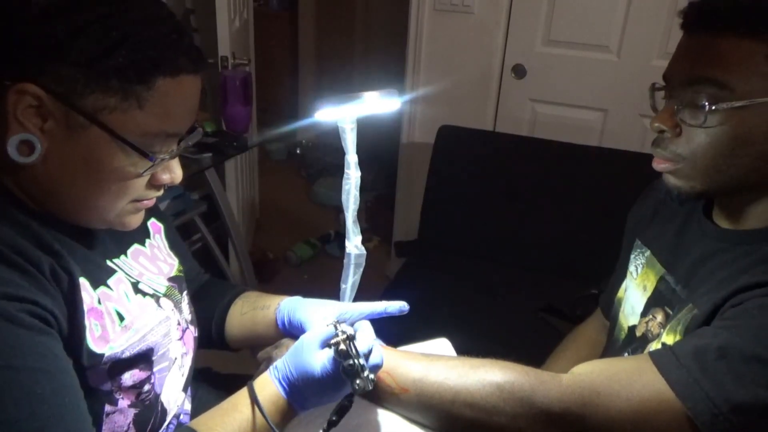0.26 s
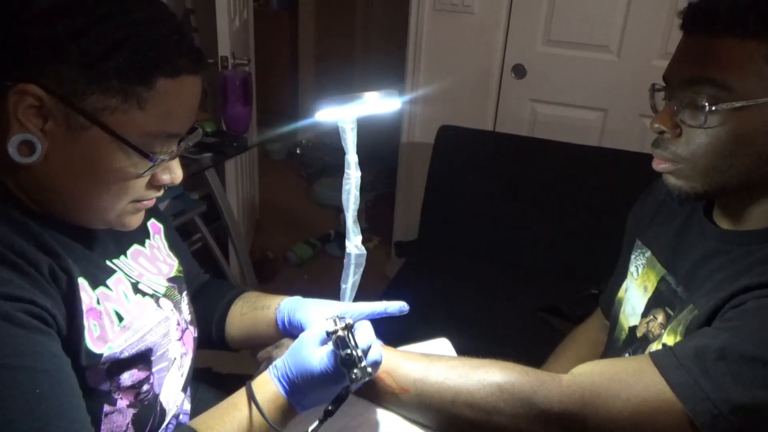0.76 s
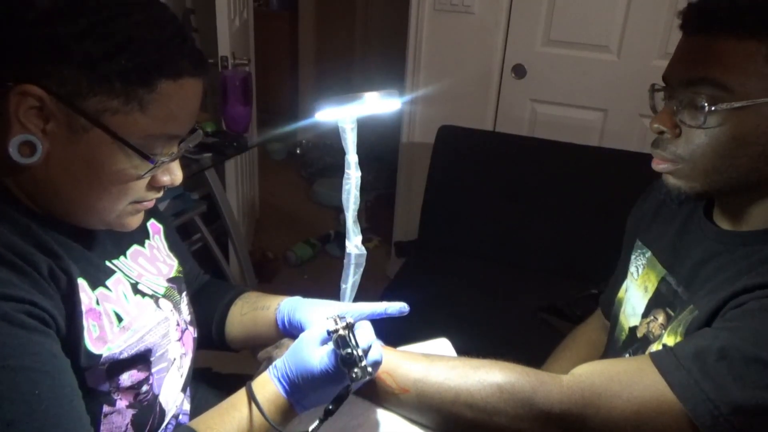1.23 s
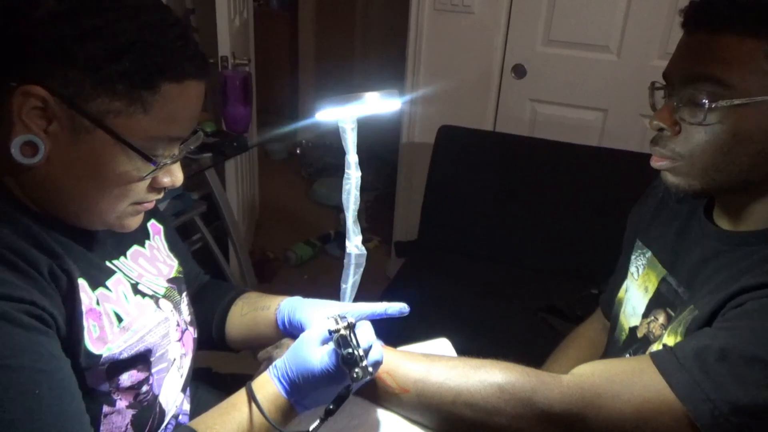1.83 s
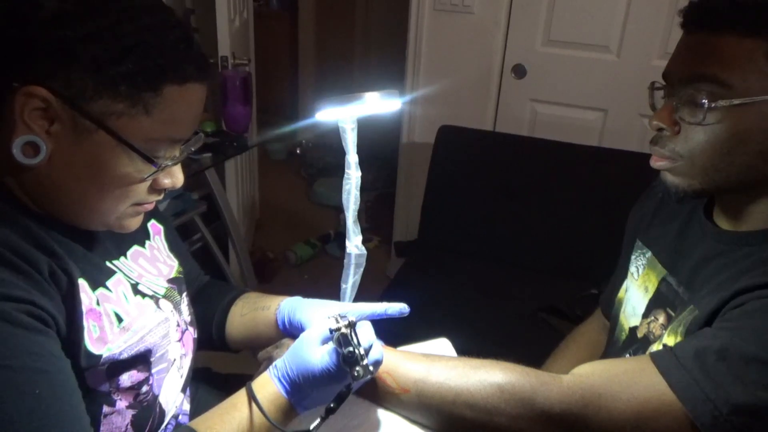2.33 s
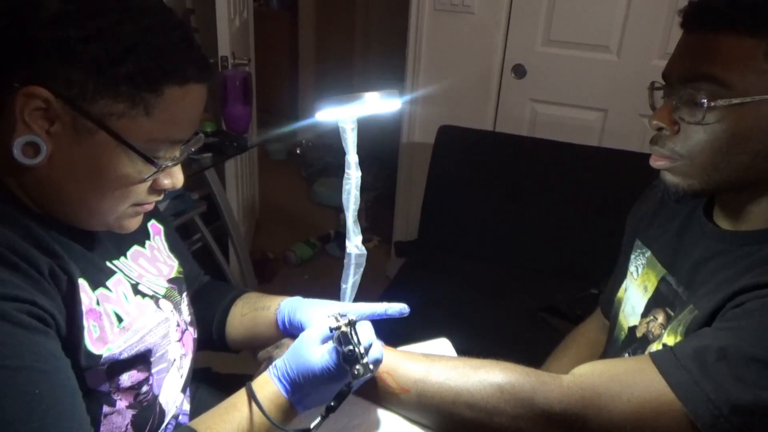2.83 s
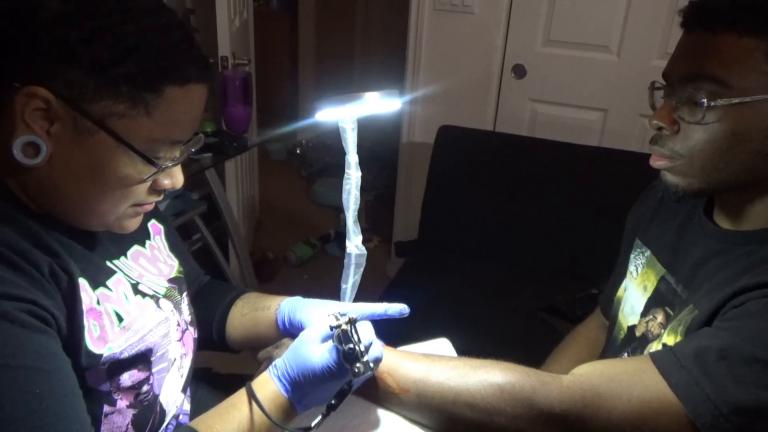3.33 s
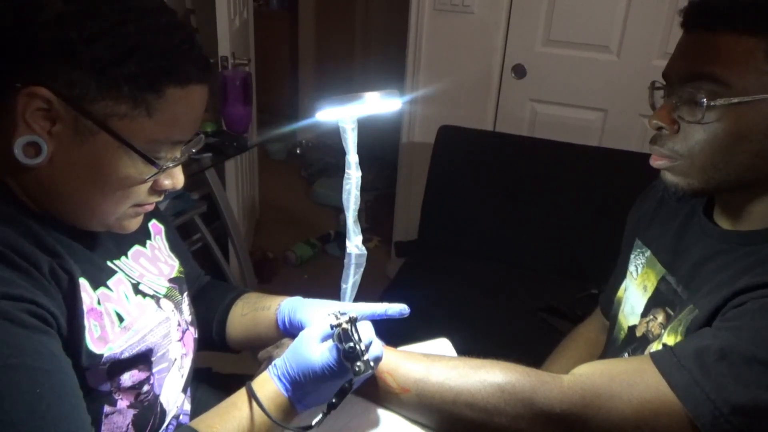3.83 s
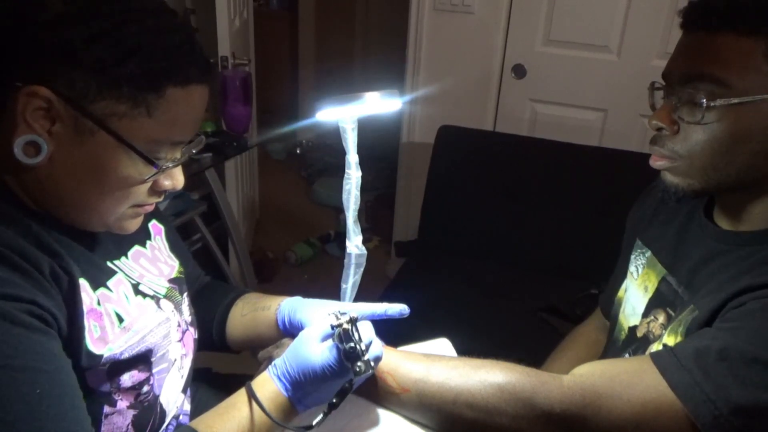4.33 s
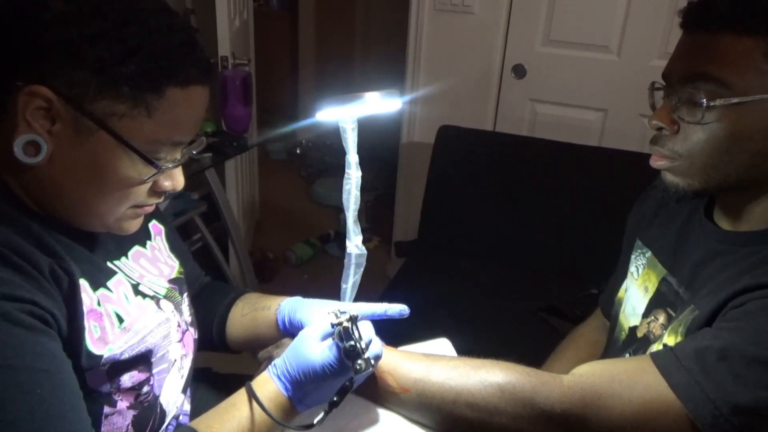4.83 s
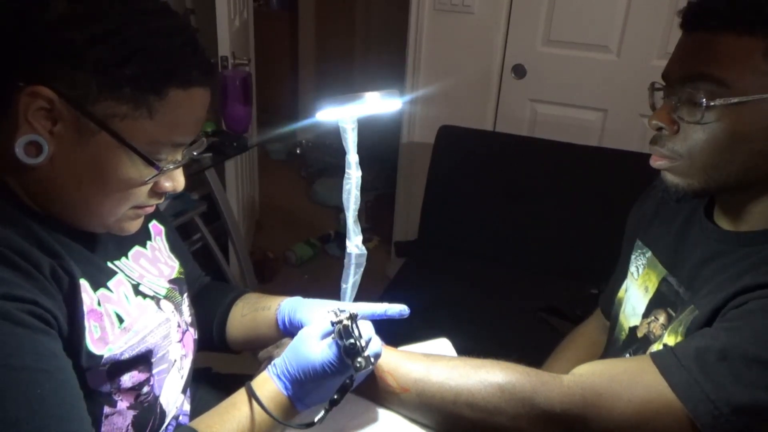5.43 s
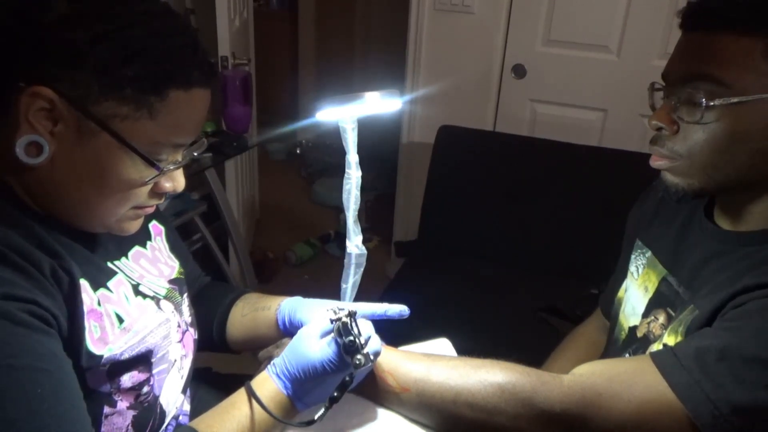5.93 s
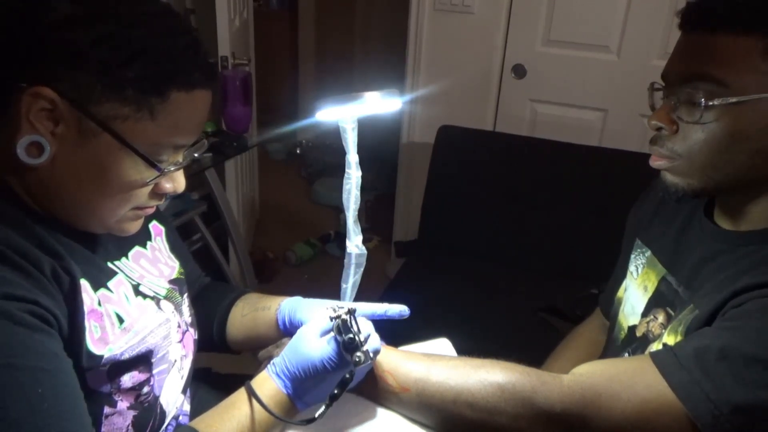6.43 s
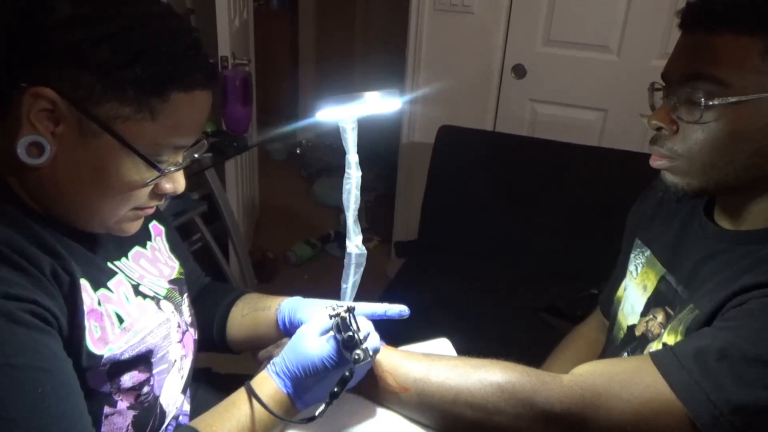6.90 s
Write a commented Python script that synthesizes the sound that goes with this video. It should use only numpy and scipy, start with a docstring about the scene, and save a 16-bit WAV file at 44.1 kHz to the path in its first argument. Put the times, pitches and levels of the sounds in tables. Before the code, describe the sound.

Steady harsh electric buzz of a tattoo machine in a small room, slightly uneven and drifting in colour, with a short woody creak near two seconds.

```python
"""A coil tattoo machine buzzes on a forearm in a small room: its armature snaps down 107 to 110 times a second.
Each snap rings the steel frame and rattles the needle; the beat jumps between two paces and turns ragged
as the needle drags. Arm, table and walls echo the snaps, and the colour drifts as the grip shifts.
Behind it is the soft rush of the room, made of filtered noise with a faint drone.
Something creaks briefly, like a seat: a row of small slips, each with a squeak and a hollow knock."""
import sys
import numpy as np
from scipy import signal
from scipy.fft import rfft, irfft, next_fast_len
from scipy.io import wavfile
from scipy.ndimage import uniform_filter1d

SR = 44100
rng = np.random.default_rng(int(sys.argv[2]) if len(sys.argv) > 2 else 0)


def waveform_to_disk(signal):
    """Save audio, clipped to [-1, 1], as 16-bit WAV at the path in sys.argv[1]."""
    frames = np.transpose(np.atleast_2d(signal))
    scaled = np.clip(frames, -1, 1) * 32767
    samples = np.round(scaled).astype(np.int16)
    wavfile.write(sys.argv[1], SR, samples)


N = 315756
TIME = np.arange(N) / SR  # seconds
SIZE = next_fast_len(N + SR, real=True)  # room for tails, so filters do not wrap around
FREQS = np.maximum(np.arange(SIZE // 2 + 1) * SR / SIZE, 1)  # Hz

# Slower pace of the armature, sagging and recovering with the load on the needle.
# Each row: time in seconds, strikes per second.
BASE_PACE = [(0.0, 108.97), (0.28, 108.61), (1.15, 108.26), (1.91, 107.9), (2.36, 108.35), (2.51, 107.5),
             (2.92, 108.4), (3.02, 107.41), (3.15, 108.31), (3.58, 107.61), (3.66, 107.86), (4.45, 107.65),
             (4.81, 107.28), (5.43, 108.17), (5.77, 107.79), (6.0, 109.13), (6.86, 108.08), (7.16, 108.3)]
# Spells in which the armature jumps to a quicker stroke. Each row: start in seconds, end in seconds.
QUICK_SPELLS = [(2.3, 2.424), (2.81, 5.818), (6.747, 7.5)]
QUICK_HZ, JUMP_S = 2.063, .06  # strikes per second added in a quick spell, and seconds a jump takes
# The needle drags and the beat turns ragged.
# Each row: start in seconds, length in seconds, timing spread in microseconds.
DRAGS = [(.5, .1, 20), (1.69, .06, 14), (2.68, .13, 25), (2.95, .15, 16), (4.24, .18, 18), (4.62, .35, 15),
         (5.42, .07, 29), (5.79, .16, 22), (6.35, .16, 28), (6.52, .22, 58), (7.08, .06, 28)]
STEADY_US, JUMP_US = 7.5, 16  # timing spread of the free beat, and that of a jump (microseconds)
# Parts of the timing spread that shift the whole beat from here on, or one snap alone
WANDER, SCATTER = .6, .42
# The needle catches: one stroke comes early and the later ones follow from there.
# Each row: time in seconds, microseconds early.
CATCHES = [(.685, 90), (.905, 60), (1.165, 115), (1.21, 100), (1.37, 110), (2.04, 135), (2.065, 125),
           (2.22, 95), (2.245, 70), (2.7, 90), (2.72, 80)]
FORCE_DB = .3  # spread of the force from snap to snap (dB)
# Rebound of the armature. The row: delay in seconds, size as a share of the snap.
REBOUND = (.000388, .3)
# Rattle of the needle bar. The row: level in dB against the snaps, decay in seconds, lowest Hz, highest Hz.
RATTLE = (-16.3, .0012, 4000, 10500)
# Chatter of the needle in its tube. The row: level in dB before the waver, decay in seconds,
# lowest Hz, highest Hz.
CHATTER = (-52.3, .004, 3900, 6100)
ROUND_TRIP_S, RETURNED = .000272, .55  # a trip along the frame and back (s), share sent round again

# The hand slowly rolls the machine over. Each row: time in seconds, tilt from 0 (upright) to 1.
TILT = [(0, 0.15), (2.3, 0.1), (3.3, 0.41), (4.2, 0.42), (5.4, 0.88), (6.2, 0.84), (7.16, 1)]
# Broad colour of one strike. Each row: frequency in Hz, relative level in dB.
STRIKE_COLOUR = [(100, -45), (350, -33.5), (700, -26), (1000, -22), (1300, -16), (2000, -20.5),
                 (2950, -19.5), (3250, -8), (4700, -11), (6300, -6.5), (7500, -2), (9500, 0.5), (11000, 5)]
# Resonances and hollows of frame and springs.
# Each row: frequency in Hz, width in Hz, lift in dB upright, lift in dB tilted.
STEEL_MODES = [(948, 74, 3.5, 6.5), (1083, 39, 8, 6.5), (1577, 84, -12, -5), (2160, 180, -2, 2.5),
               (3094, 120, -15, 4.5), (3420, 85, 1, 5), (3583, 61, 7, 5), (4092, 680, 8.5, 8),
               (5370, 173, 10.5, 11.5), (6720, 560, -2, -6.5), (7045, 146, -2.5, 13), (7810, 440, 6, 5),
               (8780, 520, 6, -1), (9050, 140, 4, 6), (9830, 330, 1.8, -8.5), (10296, 510, 4, 9)]
# The one narrow ring of the front spring.
# The row: frequency in Hz, width in Hz, level in dB upright, level in dB tilted (before the waver).
SPRING_RING = (5382.5, 35, -47.5, -41.5)
# Single resonances swell or fade as the grip shifts.
# Each row: time of the height in seconds, half-length in seconds, frequency in Hz, width in Hz, lift in dB.
GRIP_SWELLS = [(.1, 0.66, 8500, 600, 3.5), (.1, .3, 4900, 203, 5), (1.35, 0.56, 9840, 350, 2.5),
               (3.4, 0.97, 7900, 400, 1), (4.9, 0.66, 9260, 500, 1), (6.2, 0.66, 4330, 200, 4),
               (7.1, 0.64, 7860, 450, -1), (7.1, .5, 8950, 600, -2)]

# Echoes off arm, table and bodies. Each row: delay in ms, level in dB, change of delay in ms at full tilt,
# lag of the right channel in ms.
ECHOES = [(.958, -14.5, -.096, -.006), (1.596, -15, -.032, -.007), (2.108, -16, .092, .004),
          (3.179, -12, -.006, -.005), (3.971, -13.5, -.058, .003), (4.404, -13, -.043, -.005),
          (5.046, -17.5, -.15, .005), (5.861, -18, -.033, -.004)]
# Strength of reflected sound, as the top beams straight ahead. Each row: frequency in Hz, gain in dB.
REFLECTED = [(300, 1), (2200, 3), (3500, 1.5), (5500, 2), (8500, 1.8), (10300, -2)]
# Left-right likeness of diffuse sound. Each row: frequency in Hz, correlation.
LIKENESS = [(30, .99), (100, .84), (700, .86), (1300, .7), (2500, .1), (5500, 0), (8000, .5), (10000, .58)]
ROOM_DB, ROOM_T60_S = -7.3, .26  # gain of the room tail, and seconds it takes to fall by 60 dB

# Lean of the buzz to the left. Each row: frequency in Hz, dB added on the left and taken off on the right.
LEAN = [(1000, -0.5), (2200, -0.5), (4500, -0.25), (8000, 0.6), (10300, .5)]
# Loudness of the evened buzz before the waver. Each row: time in seconds, level in dB.
LOUDNESS = [(0, -26.5), (1.5, -26.5), (3, -26.5), (4, -26), (6, -26), (7.16, -26)]
# The hand never presses evenly: spread of the chance steps in dB, and steps per second
WAVER_DB, WAVER_PER_S = 0.64, 11

# Background of the room. Each row: frequency in Hz, relative level in dB.
AIR_COLOUR = [(25, -19.5), (70, -19), (160, -17.5), (250, -12.5), (400, -5), (800, -1.4), (1100, -5),
              (1600, -9), (3000, -1), (11000, -56.5)]
# Droning peaks in that background. Each row: frequency in Hz, width in Hz, lift in dB.
DRONE = [(116, 10, 7), (195, 14, 3), (243, 8, 8), (268, 8, 8), (354, 14, 8), (420, 6, 7), (464, 8, 5)]
AIR_DB = -51

# Slips of the creak. Each row: time in seconds, level in dB before the swell or knock it sets off.
SLIPS = [(1.415, -46), (1.426, -43), (1.448, -51), (1.563, -50), (1.579, -47), (1.668, -47), (1.675, -34),
         (1.683, -36), (1.693, -32), (1.701, -36), (1.713, -29.5), (1.723, -38), (1.73, -32.5), (1.75, -46),
         (1.769, -46), (1.786, -36), (1.794, -43), (1.823, -36), (1.833, -42)]
SLIP_ONSET_S = .002  # each knock sets in softly
# Pitch of the squeak, which wavers a little under load. Each row: time in seconds, frequency in Hz.
SQUEAK = [(1.42, 753), (1.69, 727), (1.735, 753), (1.84, 742)]
# The hollow body that each slip knocks.
# Each row: frequency in Hz, relative level in dB, seconds to fall by 60 dB.
CREAK_BODY = [(840, -23, .025), (412, -14, 0.04), (620, -17, 0.027), (1300, -16, 0.041)]

CUTOFF_HZ = 11060  # upper edge of the recorder


def from_db(db):
    """Decibels to gain."""
    return 10 ** (np.asarray(db) / 20)


def rms_one(x):
    """Scale to unit power."""
    return x / np.sqrt(np.mean(x ** 2) + 1e-20)


def in_time(rows):
    """The columns of a curve at every sample."""
    s, *columns = np.transpose(rows)
    return [np.interp(TIME, s, c) for c in columns]


def over_hz(points):
    """A short spectrum spread over all frequencies, in straight lines over log frequency."""
    hz, value = np.transpose(points)
    return np.interp(np.log(FREQS), np.log(hz), value)


def lifts(peaks):
    """The dB curve of a set of resonances."""
    return sum(db / (1 + (2 * (FREQS - hz) / width) ** 2) for hz, width, db in peaks)


def colour(x, curve_db):
    """Causal (minimum-phase) filter: peaks ring after a strike, never before."""
    cepstrum = irfft(np.log(from_db(curve_db)), SIZE)
    # Fold the second half onto the first to keep only what comes after the strike
    cepstrum[1:SIZE // 2] *= 2
    cepstrum[SIZE // 2 + 1:] = 0
    response = np.exp(rfft(cepstrum))
    return irfft(rfft(x, SIZE) * response, SIZE)[..., :N]


def resonate(x, hz, width):
    """A two-pole resonance with gain 1 on top."""
    r = np.exp(-np.pi * width / SR)
    forward = np.array([1, 0, -1]) * (1 - r * r) / 2
    feedback = [1, -2 * r * np.cos(2 * np.pi * hz / SR), r * r]
    return signal.lfilter(forward, feedback, x)


def clicks(times, sizes, count=8):
    """Impulses placed between the samples, each a short windowed sinc."""
    at = np.asarray(times)[:, None] * SR
    taps = np.floor(at).astype(int) + np.arange(1 - count, count + 1)
    shape = np.sinc(taps - at) * np.sinc((taps - at) / count) * np.asarray(sizes)[:, None]
    inside = (taps >= 0) & (taps < N)
    return np.bincount(taps[inside], shape[inside], N)


def spell(start, end, ramp_s):
    """A gate over time with sloping edges: 1 inside, 0 outside."""
    return np.clip(np.minimum(TIME - start, end - TIME) / ramp_s + .5, 0, 1)


def diffuse_noise():
    """White stereo noise whose left-right likeness changes with frequency."""
    alike = np.clip(over_hz(LIKENESS), -1, 1)
    mid, side = rfft(rng.standard_normal((2, SIZE)))
    shared = np.sqrt(1 + alike) * mid
    opposed = np.sqrt(1 - alike) * side * [[1], [-1]]
    return rms_one(irfft(shared + opposed, SIZE)[:, :N])


def beat(drag_ramp_s=0.018):
    """Strikes per s and their timing spread in s: ragged while the needle drags or the stroke jumps."""
    quick = sum(spell(start, end, JUMP_S) for start, end in QUICK_SPELLS)
    jumping = np.sin(np.pi * quick)  # greatest half-way through a jump
    drag_us = sum(us * spell(start, start + length, drag_ramp_s) for start, length, us in DRAGS)
    spread_us = np.sqrt(STEADY_US ** 2 + drag_us ** 2 + (JUMP_US * jumping) ** 2)
    return in_time(BASE_PACE)[0] + QUICK_HZ * quick, spread_us / 1e6


def armature(first_s=.0041):
    """One snap a cycle, each a little early or late, then a rebound."""
    rate, uneven_s = beat()
    cycles = np.cumsum(rate) / SR
    times = first_s + np.interp(np.arange(int(cycles[-1]) + 1), cycles, TIME)
    spread = np.interp(times, TIME, uneven_s)
    slip, late, force = rng.standard_normal((len(times), 3)).T
    times = times + WANDER * np.cumsum(spread * slip) + SCATTER * spread * late
    times = times - sum(us / 1e6 * (times > s) for s, us in CATCHES)
    sizes = from_db(FORCE_DB * force)
    rebound_s, share = REBOUND
    return clicks(times, sizes) + clicks(times + rebound_s, share * sizes)


def shaken(snaps, decay_s, low_hz, high_hz):
    """A burst of rattling noise after every snap, different on every stroke; rms 1."""
    fading = signal.lfilter([1], [1, -np.exp(-1 / (decay_s * SR))], snaps)
    band = signal.butter(2, [low_hz, high_hz], "band", fs=SR, output="sos")
    return rms_one(signal.sosfilt(band, fading * rng.standard_normal(N)))


def bending(x, travel_s=0.0008078, top_hz=11000):
    """Bending waves run slower at low pitch and go to and fro: each snap spreads into a falling chirp."""
    chirp = np.exp(-2j * np.pi * travel_s * (2 * np.sqrt(top_hz * FREQS) - FREQS))
    trip = np.exp(-2j * np.pi * FREQS * ROUND_TRIP_S)
    to_and_fro = (trip - RETURNED) / (1 - RETURNED * trip)
    return irfft(rfft(x, SIZE) * chirp * to_and_fro, SIZE)[:N]


def steel(blows, tilt):
    """The blows ring the machine; which resonances face the microphone depends on its tilt."""
    modes = np.array(STEEL_MODES)
    upright = colour(blows, over_hz(STRIKE_COLOUR) + lifts(modes[:, [0, 1, 2]]))
    tilted = colour(blows, over_hz(STRIKE_COLOUR) + lifts(modes[:, [0, 1, 3]]))
    return (1 - tilt) * upright + tilt * tilted


def grip(x):
    """The fingers damp and free single resonances, so the colour of the buzz drifts."""
    for s, half_s, hz, width, db in GRIP_SWELLS:
        gain = from_db(db * np.exp(-((TIME - s) / half_s) ** 2))
        x = x + (gain - 1) * resonate(x, hz, width)
    return x


def near_echoes(x, tilt):
    """Short paths that change length as the hand moves, so single harmonics swell and fade."""
    fine = signal.resample_poly(x, 4, 1)  # finer steps, to read between the samples
    fine_time = np.linspace(0, N / SR, len(fine), endpoint=False)
    out = np.zeros((2, N))
    for delay_ms, db, stretch_ms, lag_ms in ECHOES:
        for channel, offset_ms in enumerate((-lag_ms / 2, lag_ms / 2)):
            delay = (delay_ms + stretch_ms * tilt + offset_ms) / 1000
            out[channel] += from_db(db) * np.interp(TIME - delay, fine_time, fine)
    return out


def room(x, onset_s=0.0063):
    """The diffuse tail of a small furnished room: the sound smeared by fading noise."""
    tail = diffuse_noise() * from_db(-60 * TIME / ROOM_T60_S) * (TIME > onset_s)
    tail = rms_one(tail) / np.sqrt(N)  # unit energy
    return from_db(ROOM_DB) * irfft(rfft(x, SIZE) * rfft(tail, SIZE), SIZE)[:, :N]


def spring_ring(blows, tilt):
    """A single sharp mode, loudest when a harmonic of the beat falls on it."""
    hz, width, upright_db, tilted_db = SPRING_RING
    level_db = upright_db + (tilted_db - upright_db) * tilt
    return rms_one(resonate(blows, hz, width)) * from_db(level_db)


def waver():
    """Slow chance swells of the machine, as a gain."""
    steps = rng.standard_normal(N // 1000)
    return from_db(WAVER_DB * np.interp(TIME * WAVER_PER_S, np.arange(len(steps)), steps))


def machine():
    """Snaps ring the steel and its surroundings; the buzz is evened out, then set to its loudness."""
    tilt = np.clip(in_time(TILT)[0], 0, 1)
    snaps = armature()
    rattle_db, *rattle = RATTLE
    blows = rms_one(snaps - snaps.mean()) + from_db(rattle_db) * shaken(snaps, *rattle)
    direct = grip(steel(bending(blows), tilt))
    spill = colour(direct, over_hz(REFLECTED))
    together = direct + near_echoes(spill, tilt) + room(spill)
    heard = rfft(together, SIZE) * from_db(over_hz(LEAN) * [[1], [-1]])
    # Running power of the part below the recorder's edge
    audible = irfft(heard.mean(axis=0) * (FREQS < CUTOFF_HZ), SIZE)[:N]
    power = uniform_filter1d(uniform_filter1d(audible ** 2, size=SR // 12), size=SR // 18)
    buzz = irfft(heard, SIZE)[:, :N] / np.sqrt(power) * from_db(in_time(LOUDNESS)[0])
    chatter_db, *chatter = CHATTER
    return buzz + spring_ring(blows, tilt) + from_db(chatter_db) * shaken(snaps, *chatter)


def air():
    """Soft rush of the room, filtered noise with a faint drone, as of ventilation."""
    return from_db(AIR_DB) * rms_one(colour(diffuse_noise(), over_hz(AIR_COLOUR) + lifts(DRONE)))


def creak(rise_s=0.0039, knock_db=1, pan_db=-1.5):
    """Stick and slip: every slip swells a hollow squeak and knocks the body."""
    t = TIME[:SR // 4]
    times, slip_db = np.transpose(SLIPS)
    slips = clicks(times, from_db(slip_db))
    pulse = (t / rise_s * np.exp(1 - t / rise_s)) ** 2  # rises, then dies away
    swell = signal.fftconvolve(slips, pulse)[:N]
    squeak = swell * np.sin(2 * np.pi * np.cumsum(in_time(SQUEAK)[0]) / SR)
    body = sum(from_db(db - 60 * t / t60) * np.sin(2 * np.pi * hz * t) for hz, db, t60 in CREAK_BODY)
    soft = 1 - np.exp(-(t / SLIP_ONSET_S) ** 2)
    knocks = from_db(knock_db) * signal.fftconvolve(slips, body * soft)[:N]
    close = squeak + knocks
    # Half the usual room tail, and a lean to the right
    return (close + .5 * room(close)) * from_db([[pan_db], [-pan_db]])


def scene():
    """Machine, room air and creak together."""
    return machine() * waver() + air() + creak()


def record(dry, leak_db=-12, leak_fall_hz=44):
    """The recorder cuts the top steeply; a faint skirt falls by 1 dB every leak_fall_hz above the edge."""
    above = np.maximum(FREQS - CUTOFF_HZ, 0)
    passed = 1 / (1 + (above / 25) ** 4)
    skirt = from_db(leak_db - above / leak_fall_hz)
    return irfft(rfft(dry, SIZE) * np.maximum(passed, skirt), SIZE)[:, :N]


dry = scene()
out = record(dry)
waveform_to_disk(out)
```